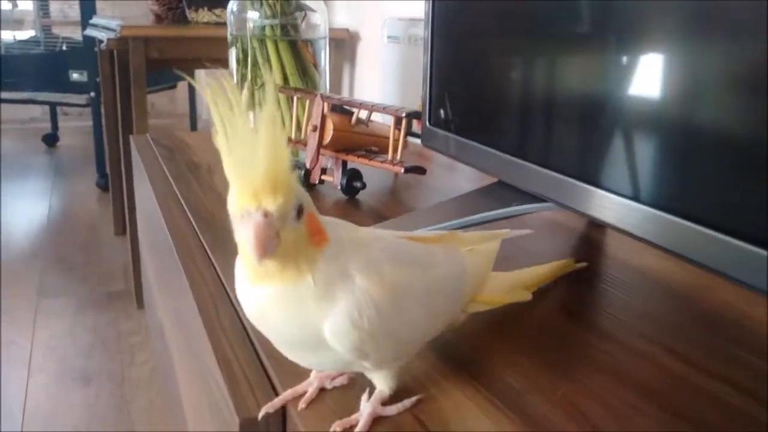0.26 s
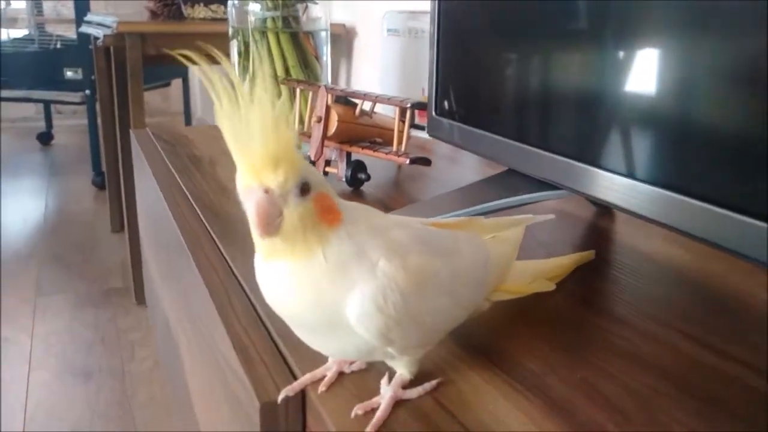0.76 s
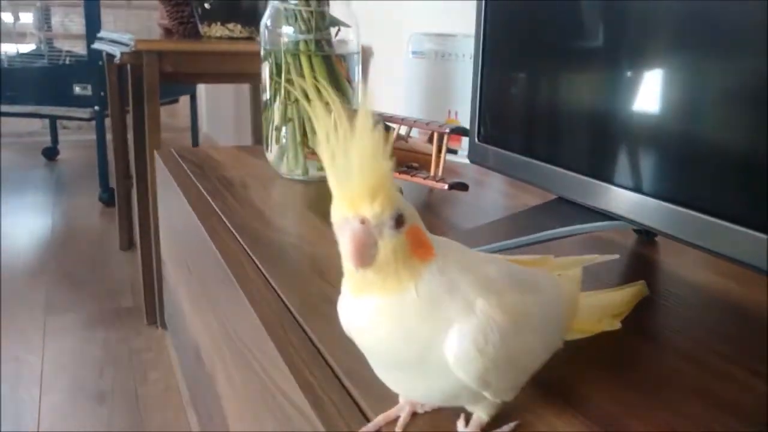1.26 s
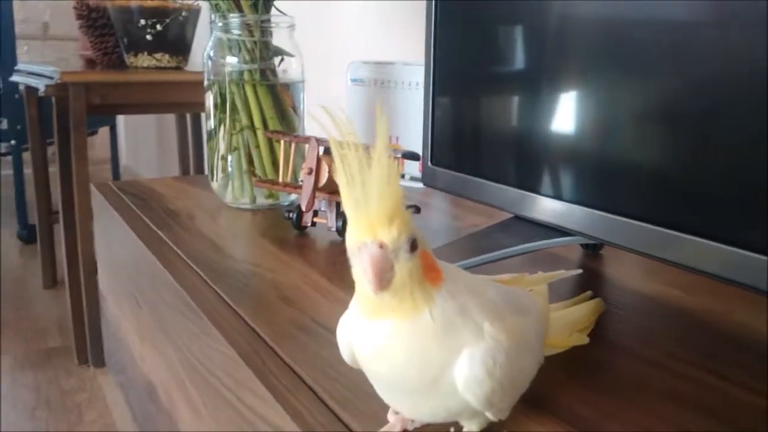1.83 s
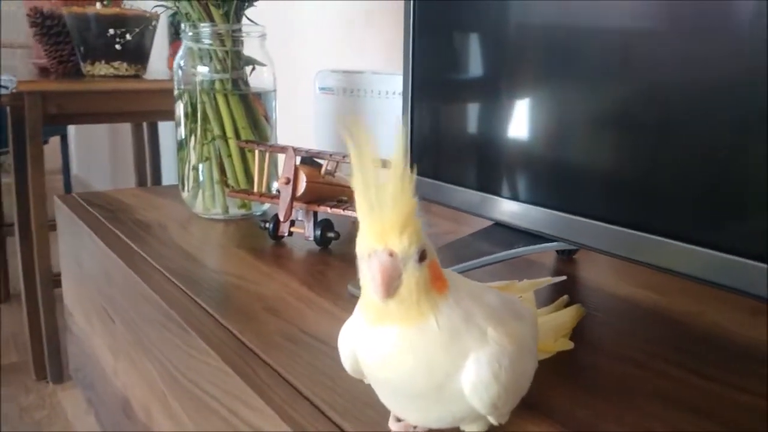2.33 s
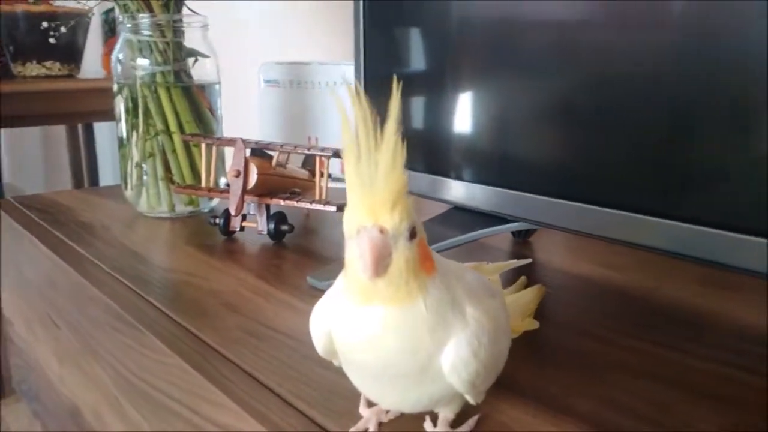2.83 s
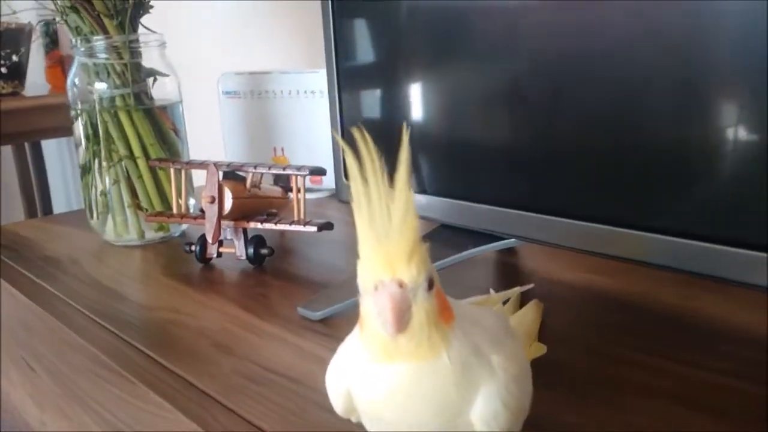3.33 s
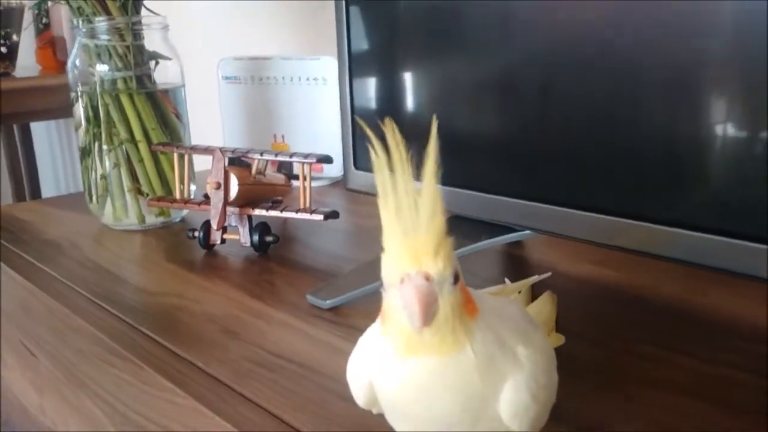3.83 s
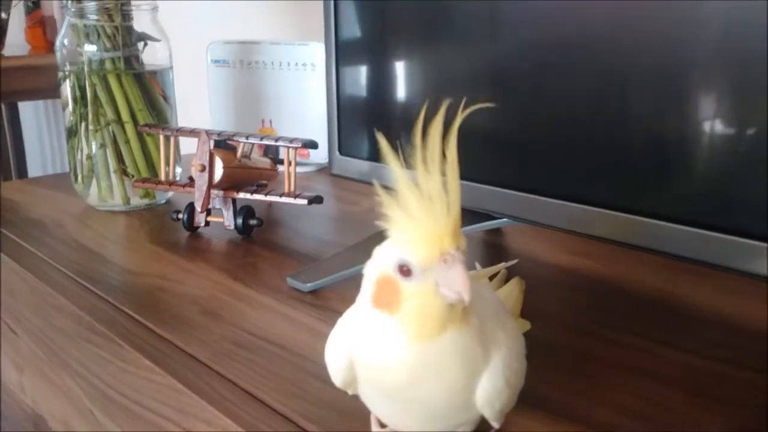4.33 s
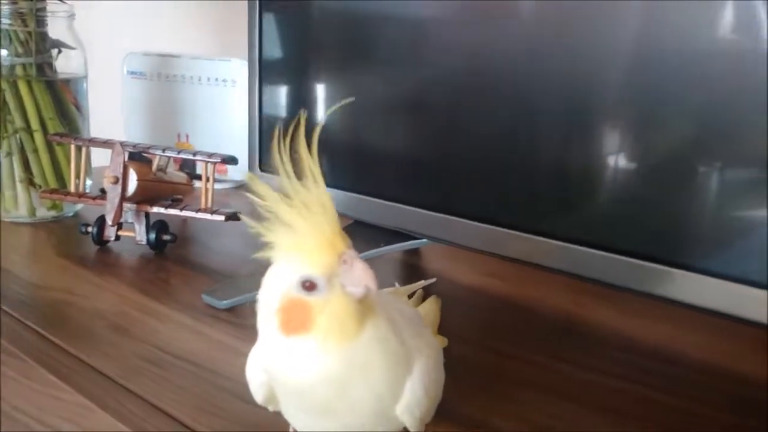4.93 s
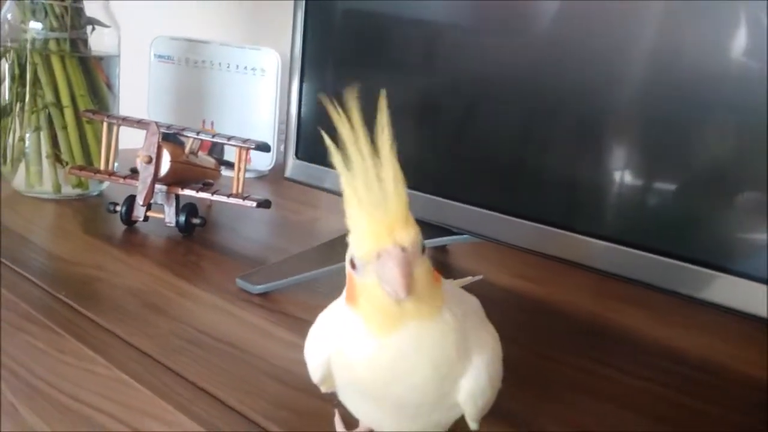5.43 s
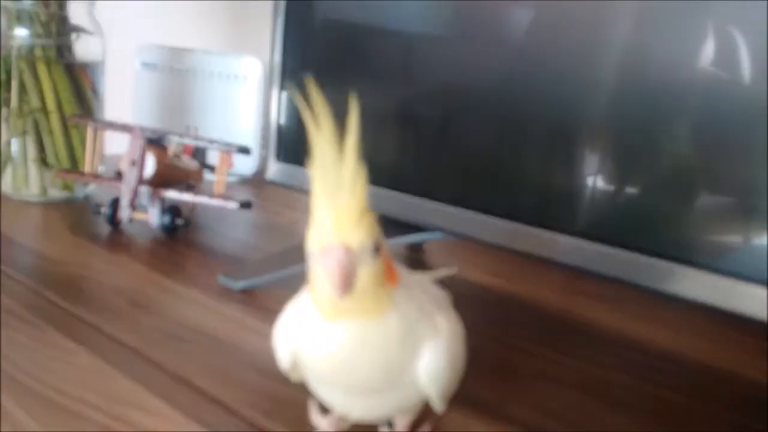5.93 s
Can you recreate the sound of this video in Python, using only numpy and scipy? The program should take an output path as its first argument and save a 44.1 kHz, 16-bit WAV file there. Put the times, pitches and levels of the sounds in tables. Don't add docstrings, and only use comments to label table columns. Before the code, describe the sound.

A cockatiel in a hard-surfaced living room opens with a loud falling peep, then gives scattered quick chirps, swoops and soft whistles, peaking in two high cries around four seconds before going mostly quiet. A faint motor hum throbs beneath. The close handheld microphone picks up finger rubs and dull bumps, then sharp taps and a heavy slam near the end.

```python
import sys
import numpy as np
from scipy import signal
from scipy.fft import rfft, irfft, next_fast_len
from scipy.io import wavfile
from scipy.ndimage import uniform_filter1d

SR = 44100
rng = np.random.default_rng(int(sys.argv[2]) if len(sys.argv) > 2 else 0)


def magnitude_from_level(level_db):
    exponent = np.asarray(level_db, float) / 20
    return 10 ** exponent


def bounce(signal):
    frames = np.transpose(np.atleast_2d(signal))
    limited = np.clip(frames, -1, 1)
    pcm = np.round(limited * 32767).astype(np.int16)
    wavfile.write(sys.argv[1], SR, pcm)


N = 272097

# f/Hz, level/dB per Hz
LOW_NOISE = [(18, -56.5), (30, -55), (59, -46), (113, -28), (167, -13.5), (269, -17), (305, 2), (351, -1),
             (392, 1), (521, -34.5), (610, -9), (670, -11), (823, -10.5), (905, -11), (1300, -17),
             (1690, -21), (2860, -120)]
# t/s, level/dB
LOW_NOISE_LEVEL = [(0.0, -41), (0.41, -42.5), (0.96, -38.5), (1.6, -41), (2.13, -39), (3.56, -40.5),
                   (4.11, -50), (4.69, -51), (5.05, -52.5), (5.77, -49), (6.03, -38), (6.17, -44)]
# f/Hz, level/dB per Hz
HIGH_NOISE = [(650, -45.5), (1100, -25.5), (1210, -14), (1440, -13), (1850, -3), (2000, -3.5), (2220, -5),
              (2580, -1.5), (3260, -2.5), (3550, -4.5), (3860, -8), (4120, -15), (6000, -33), (7800, -66),
              (13200, -120)]
# t/s, level/dB
HIGH_NOISE_LEVEL = [(0, -49), (2.2, -55.5), (3.4, -55), (4.5, -59.5), (5.05, -60), (5.2, -53.5),
                    (5.4, -57.5), (5.6, -61), (5.9, -58), (6.17, -53.5)]
# f/Hz, level/dB per Hz
PREAMP = [(2940, -23), (5000, -15.5), (5820, -4.5), (6100, -15), (6620, -13.5), (8000, -10.5),
          (10500, -12.5), (14000, -1.5), (15100, -12), (15500, -7), (15800, -57)]
# f/Hz, likeness (0 to 1)
LIKENESS = [(60, 0.88), (240, 0.98), (950, 1), (3770, 0.9), (15000, 0.11)]

# t/s, length/s, hum level/dB, whine level/dB
THROBS = [
    (0.048, 0.46, -50, -56),
    (0.67, 0.81, -47, -53.5),
    (1.468, 0.39, -46.5, -48.5),
    (2.102, 0.35, -48.5, -49),
    (2.659, 0.34, -49, -51),
    (3.271, 0.35, -46.5, -46),
    (3.938, 0.16, -51.5, -47),
    (4.37, 0.91, -81, -60),
    (6.01, 0.13, -60, -48),
]
# t/s, level/dB, f/Hz
CREAK = [
    (5.967, -29.5, 345),
    (6.03, -26.5, 372.4),
    (6.1, -33, 356),
    (6.115, -56, 380),
    (6.15, -34, 367),
    (6.17, -66.5, 363),
]

# t/s, length/s, level/dB
RUBS = [(0.52, 0.072, -57.5), (1.244, 0.35, -51.5), (1.45, .25, -46), (1.727, 0.14, -43),
        (2.001, 0.089, -47.5), (2.381, 0.071, -55.5), (2.53, 0.17, -50.5), (3.03, 0.24, -48),
        (3.589, .22, -46.5), (4.167, 0.044, -59.5), (4.568, 0.077, -54.5), (5.811, 0.016, -40.5)]
# f/Hz, level/dB per Hz
RUB_COLOUR = [(25, -54.5), (45, -8.5), (70, -0.5), (150, 3.5), (250, 1.5), (450, -4), (900, -42)]
# t/s, peak level/dB, ring f/Hz, ring time to fall 60 dB/s, knock level/dB
BUMPS = [(0.089, -27, 147, 0.026, -22.5), (1.908, -36, 366, 0.054, -10), (2.065, -27.5, 294, 0.056, -1.5),
         (2.3, -25, 317, 0.021, -7), (4.704, -41, 230, 0.092, -10), (2.559, -21, 120, 0.034, -17),
         (2.582, -30.5, 117.7, 0.12, -6.5), (2.608, -22.5, 123.5, 0.015, -17),
         (2.752, -29.5, 340, 0.08, -26), (3.689, -27.5, 352, 0.068, -12), (4.554, -38, 360, 0.087, -14),
         (4.688, -37, 405, 0.052, -11), (4.721, -37, 420, 0.064, -3), (5.713, -34.5, 392, 0.076, -23),
         (5.742, -29, 146, 0.025, -21)]
# t/s, peak level/dB, ring f/Hz, ring time to fall 60 dB/s, rattle level/dB
TICKS = [
    (5.5127, -19.5, 2500, 0.002, -12),
    (5.5303, -17, 2640, 0.0043, -34),
]
# t/s, peak level/dB
SLAMS = [
    (5.5197, -14.5),
    (5.8413, 3.5),
    (5.896, -16),
]
# t/s, length/s, level/dB
RUSTLES = [
    (5.943, .2, -59),
]

# f/Hz, level/dB
UPPER = [(3500, -25.5), (5000, -16.5), (5700, -19.5), (6200, -18.5), (6600, -31.5), (7000, -44),
         (7700, -27.5), (8500, -39.5), (9600, -63.5), (10900, -33.5), (12000, -40), (13200, -32.5),
         (14200, -24), (14900, -35.5), (15500, -55)]
# f/Hz, level/dB
THROAT = [(1150, -8), (1450, -6), (1750, 1.5), (2400, -7), (3300, -5), (4300, -0.5), (5250, 1),
          (5700, -1.5), (6600, -20.5)]
# band f/Hz (low, high), level/dB
BREATH = [((2300, 4400), -26), ((4400, 6100), -39), ((8900, 9000), -55.5), ((10500, 14000), -46.5)]
# t/s, third partial level/dB, higher partials level/dB, left-right level/dB
FACING = [(0, -2, 2.5, 2), (.14, -5.5, -1.5, 2), (.29, -2, 1.5, 1), (.455, 5, 2.5, 1), (.63, -1.5, 0.5, 0),
          (.87, 4, 2.5, 0), (1.07, -3.5, -5, 1.5), (1.3, 2.5, -0.5, 0), (1.48, 1, 4, 0),
          (1.87, -3, -1, -0.5), (3.14, 4, -0.5, -0.5), (3.59, 1.5, -2, -0.5), (3.7, -5, 1.5, -1),
          (4.05, 0, 2, -1), (4.53, 0.5, 0.5, -1), (4.72, -4, 4, -1), (5.75, 1, 3, 0), (6.03, 6, 5, 0)]

# t/s, length/s, top f/Hz, effort level/dB, overtones level/dB
CHIRPS = [
    (0.293, 0.069, 1804, -25.5, 1),
    (1.306, 0.048, 1635, -31, 0.5),
    (1.479, .084, 1636, -26.5, -8.5),
    (5.755, 0.056, 1564, -45.5, 11),
]
SQUAWKS = [
    (3.587, .076, 2366, -27, -5),
]
SWOOPS = [
    (1.743, .057, 2177, -28, -15),
    (2.399, 0.04, 2082, -26.5, -19.5),
    (2.75, 0.053, 2050, -33, -25.5),
    (3.469, 0.069, 2203, -41, -10.5),
]
CRIES = [
    (4.045, .097, 3100, -19.5, -12.5),
    (4.153, .085, 3292, -24.5, -11.5),
]
PEEPS = [
    (0.0, 0.052, 2340, -11, -4.5),
]
SLIDES = [
    (3.84, 0.042, 1914, -33.5, 0.51),
    (4.308, .068, 2066, -44, 8.7),
]
SHRIEKS = [
    (4.533, .12, 2918, -34, -2.5),
]
PIPS = [
    (0.873, 0.034, 1735, -31, 6.1),
    (1.066, 0.027, 1680, -34, 4.5),
    (6.026, 0.045, 1672, -50, 19.5),
]
DIPS = [
    (0.143, .05, 1893, -21, -2),
    (.455, .066, 1925, -17.5, -6.5),
]
YELPS = [
    (3.701, .066, 2802, -24, -5.5),
]
MUMBLES = [
    (.632, .058, 1826, -25.5, -3),
]

# t/s, length/s, first f/Hz, last f/Hz, effort level/dB
WHISTLES = [(0.132, .02, 2150, 1880, -23), (4.315, 0.054, 2060, 1997, -45), (1.616, 0.022, 2106, 2058, -24),
            (1.639, 0.016, 2020, 2054, -21), (2.419, 0.029, 1719, 1660, -26),
            (3.518, 0.015, 1754, 1625, -31.5), (3.641, 0.026, 1740, 1660, -35.5),
            (3.872, 0.047, 1843, 1657, -35), (1.592, 0.035, 1630, 1600, -41.5),
            (4.619, 0.022, 1668, 1706, -35), (1.5, 0.03, 1722, 2400, -44), (1.864, 0.13, 1597, 1766, -41),
            (1.869, 0.044, 1157, 1103, -48.5), (2.513, 0.044, 1302, 1194, -44.5),
            (2.794, 0.049, 1818, 2123, -33), (2.865, .06, 1422, 1138, -46),
            (3.242, 0.047, 1314, 1200, -42.5), (4.248, 0.028, 1550, 1200, -57),
            (4.357, 0.035, 1940, 2065, -36.5), (3.757, .035, 2700, 2400, -36.5),
            (2.84, 0.043, 1900, 2120, -40)]
MORE_WHISTLES = [
    (0.0, .014, 2500, 2330, -26),
    (3.765, .04, 1500, 1200, -43),
    (2.0, .07, 1330, 1180, -50),
    (1.64, .05, 1120, 1000, -52),
]
BUZZES = [
    (1.874, 0.078, 2307, 1965, -30.5),
    (3.139, 0.065, 1944, 1797, -35.5),
    (4.706, 0.07, 2217, 1798, -42.5),
]

CHIRP = dict(last_hz=1200, droop_hz=1070, drop_hz=16120, landing_s=0.00078, attack_s=0.0084, release_s=0.018,
             fade_db=-5, lift_db=1.5, third_db=-8.5, harsh_db=3, open_share=0.59, shut_db=-14)
SQUAWK = dict(last_hz=1201, droop_hz=1510, drop_hz=26060, landing_s=0.001, attack_s=0.005, release_s=0.024,
              fade_db=-5, lift_db=-7, third_db=-9, harsh_db=13.5, open_share=0.58, shut_db=-15)
SWOOP = dict(last_hz=1660, droop_hz=1490, drop_hz=34960, landing_s=0.016, attack_s=0.015, release_s=0.00045,
             fade_db=-6, lift_db=1, third_db=-20.5, harsh_db=2, open_share=0.77, shut_db=-15.5)
CRY = dict(last_hz=1658, droop_hz=10100, drop_hz=40200, landing_s=0.014, attack_s=0.023, release_s=0.0041,
           fade_db=-17.5, lift_db=-1, third_db=-18, harsh_db=12.5, open_share=1, shut_db=-17)
PEEP = dict(last_hz=1224, droop_hz=5550, drop_hz=16540, landing_s=0.00048, attack_s=0.0024, release_s=0.073,
            fade_db=-7.5, lift_db=-2.5, third_db=-0.5, harsh_db=1.5, open_share=0.77, shut_db=-35.5)
SLIDE = dict(last_hz=1680, droop_hz=2660, drop_hz=11600, landing_s=0.0033, attack_s=0.0045, release_s=0.0053,
             fade_db=-3, lift_db=-0.5, third_db=-14.5, harsh_db=4.5, open_share=0.21, shut_db=-1.5)
SHRIEK = dict(last_hz=1200, droop_hz=1066, drop_hz=27200, landing_s=0.00088, attack_s=0.0037, release_s=0.032,
              fade_db=-1.5, lift_db=-1, third_db=0, harsh_db=6, open_share=0.1, shut_db=0)
PIP = dict(last_hz=1245, droop_hz=4400, drop_hz=16840, landing_s=0.0024, attack_s=0.0047, release_s=0.019,
           fade_db=-4.5, lift_db=-0.5, third_db=-15.5, harsh_db=-0.5, open_share=0.28, shut_db=-15.5)
DIP = dict(last_hz=1259, droop_hz=2860, drop_hz=16360, landing_s=0.0011, attack_s=0.0025, release_s=0.032,
           fade_db=-10.5, lift_db=1.5, third_db=-6.5, harsh_db=0.5, open_share=0.88, shut_db=-20.5)
YELP = dict(last_hz=1705, droop_hz=1900, drop_hz=44600, landing_s=0.003, attack_s=0.006, release_s=0.0061,
            fade_db=-10, lift_db=-2.5, third_db=-6, harsh_db=15.5, open_share=0.7, shut_db=-17)
MUMBLE = dict(last_hz=1243, droop_hz=4200, drop_hz=19900, landing_s=0.0009, attack_s=0.0038, release_s=0.012,
              fade_db=-9.5, lift_db=0, third_db=-5.5, harsh_db=-1, open_share=0.93, shut_db=-42)
PURE = dict(second_db=-30, third_db=-37.5, harsh_db=-12)
PRESSED = dict(second_db=-24.5, third_db=-21, harsh_db=9.5)

# delay t/s, level/dB
ECHOES = [(.0023, -11), (.0054, -8), (.0093, -3.5), (.0139, -11), (.0187, -8), (.0247, -18)]
# f/Hz, time to fall 60 dB/s
ROOM = [(1000, 0.62), (2000, 0.46), (3500, 0.45), (6000, 0.33), (12000, 0.22)]
# f/Hz, level/dB
CASE = [(1300, 5.5), (1660, 2.5), (1880, -0.5), (2080, 3), (2380, 8), (2700, 4), (3000, 7), (3330, -2),
        (3600, 4.5), (3950, 1), (4330, 2), (4800, -17), (5250, -15), (5650, -13.5), (6100, -12.5)]
# f/Hz, width/Hz, level/dB
CAVITY = [(1676, 140, -7.5), (2990, 160, -3), (3620, 260, -13), (4495, 320, -8), (5280, 200, -8),
          (5960, 150, 0.5)]
# f/Hz, level/dB
PORT_LEVEL = [(60, -1), (120, 0), (240, -0.5), (480, -0.5), (950, -1.5), (1890, 0.5), (3770, 3), (7520, 5),
              (15000, 2)]
# f/Hz, phase/radians
PORT_PHASE = [(0, 0), (1400, 0.18), (2070, 1.1), (2760, 0.59), (4570, 0.81), (9390, -2.5), (11700, 3),
              (14400, -2.5), (15200, -6.5)]

LONGEST = 6000


def evened(x):
    return x / np.sqrt(np.mean(x ** 2) + 1e-20)


def read(points, hz):
    f, value = np.transpose(points)
    return np.interp(np.log(hz + 1), np.log(f + 1), value)


def at_time(rows, axis, t):
    return np.interp(t, [r[0] for r in rows], [r[axis] for r in rows])


def curve(rows, axis):
    return at_time(rows, axis, np.arange(N) / SR)


def add(mix, s, sound):
    part = mix[round(s * SR):][:len(sound)]
    part += sound[:len(part)]


def drift(count, span):
    once = uniform_filter1d(rng.standard_normal(count), span)
    return evened(uniform_filter1d(once, span))


def swell(s, length, edge):
    t = np.arange(N) / SR - s
    return np.sin(np.pi / 2 * np.clip(np.minimum(t, length - t) / edge, 0, 1)) ** 2


def bandpass(order, band, x):
    return signal.lfilter(*signal.butter(order, band, "band", fs=SR), x)


def noise(colour, patchy_db, band):
    frames, hz = N // 256 + 5, np.fft.rfftfreq(2048, 1 / SR)
    a, b, c, d, patches = rng.standard_normal((frames // 2, 1025, 5)).T
    patches = evened(uniform_filter1d(uniform_filter1d(patches, 10, 0), 6, 1))
    same = np.clip(read(LIKENESS, hz), -1, 1)[:, None]
    left = a + 1j * b
    right = same * left + np.sqrt(1 - same ** 2) * (c + 1j * d)
    gain = magnitude_from_level(read(colour, hz))
    inside = (hz > band[0]) & (hz < band[1])
    share = np.sqrt(np.sum(gain[inside] ** 2) / np.sum(gain ** 2))
    z = np.array([left, right]) * gain[:, None] * magnitude_from_level(patchy_db * patches)
    return evened(signal.istft(z, nperseg=2048, noverlap=1536)[1][:, :N]) / share


def preamp_hiss():
    return magnitude_from_level(-71) * noise(PREAMP, patchy_db=4.0, band=(7000, 15000))


def room_noise():
    low = magnitude_from_level(curve(LOW_NOISE_LEVEL, axis=1)) * noise(LOW_NOISE, patchy_db=2.0, band=(250, 1000))
    high = magnitude_from_level(curve(HIGH_NOISE_LEVEL, axis=1)) * noise(HIGH_NOISE, patchy_db=1.2, band=(1100, 6000))
    return low + high


def motor():
    hum_hz, whine_hz = 129.2, 710
    waver = 1 + 0.00561 * drift(N, span=3000)
    hum, whine = (sum(magnitude_from_level(row[k]) * swell(row[0], row[1], 0.0092) for row in THROBS) for k in (2, 3))
    hum = hum * np.sin(2 * np.pi * np.cumsum(hum_hz * waver) / SR)
    whine = whine * np.sin(2 * np.pi * np.cumsum(whine_hz * waver) / SR)
    creak = magnitude_from_level(curve(CREAK, axis=1)) * np.sin(2 * np.pi * np.cumsum(curve(CREAK, axis=2)) / SR)
    return hum + whine + swell(CREAK[0][0] - 0.005, 1, 0.01) * creak


def rubbing():
    slide = sum(magnitude_from_level(db) * swell(s, length, 0.044) for s, length, db in RUBS)
    lumps = magnitude_from_level(2.5 * drift(N, span=400))
    rumble = noise(RUB_COLOUR, patchy_db=1.5, band=(40, 240))
    return (magnitude_from_level(-55.5) + slide * lumps) * rumble


def bumps():
    out, t = np.zeros(N), np.arange(8000) / SR
    onset = (1 - np.exp(-t / 0.00068)) ** 2
    for s, db, hz, t60, knock_db in BUMPS:
        turns = hz * (t + 0.0016 * (1 - np.exp(-t / 0.00047)))
        ring = magnitude_from_level(-60 * t / t60) * np.sin(2 * np.pi * turns)
        knock = magnitude_from_level(knock_db - 60 * t / 0.039) * np.sin(2 * np.pi * 720 * t)
        thud_db = -12.5 - 0.35 * knock_db
        thud = magnitude_from_level(thud_db - 60 * t / 0.033) * np.sin(2 * np.pi * 72 * t)
        add(out, s, magnitude_from_level(db + 5.0) * onset * (ring + knock + thud))
    return out


def ticks():
    out, t = np.zeros(N), np.arange(8000) / SR
    onset = (1 - np.exp(-t / 0.00019)) ** 2
    for s, db, hz, t60, rattle_db in TICKS:
        rattle = bandpass(2, [900, 4300], rng.standard_normal(len(t)))
        ping = magnitude_from_level(9.5 - 60 * t / t60) * onset * np.sin(-2 * np.pi * hz * t)
        add(out, s, magnitude_from_level(db) * (ping + magnitude_from_level(rattle_db + 1.0 - 60 * t / 0.04) * rattle))
    return out


def slams():
    boom_hz, sink_hz, sink_s = 52.5, 270, 0.0034
    out, t = np.zeros(N), np.arange(4000) / SR
    turns = boom_hz * t + sink_hz * sink_s * (1 - np.exp(-t / sink_s))
    fade = (1 - np.exp(-t / 0.00066)) ** 2 * (np.exp(-t / 0.0025) + magnitude_from_level(-19 - 60 * t / 0.12))
    boom = fade * np.sin(2 * np.pi * turns)
    knock = magnitude_from_level(-13.0 - 60 * t / 0.014) * np.sin(2 * np.pi * 760 * t)
    for s, db in SLAMS:
        add(out, s, magnitude_from_level(db) * (boom + knock))
    return out


def blows():
    dull = signal.butter(6, 4300, fs=SR, output="sos")
    sides_db = np.array([[-1.5], [1.5]])
    return magnitude_from_level(sides_db) * signal.sosfilt(dull, bumps() + ticks() + slams())


def feathers():
    hiss = evened(bandpass(3, [3400, 5900], rng.standard_normal(N)))
    strength = sum(magnitude_from_level(db) * swell(s, length, 0.02) for s, length, db in RUSTLES)
    return strength * magnitude_from_level(2.7 * drift(N, span=150)) * hiss


def falling(row, last_hz, droop_hz, drop_hz, landing_s, attack_s, release_s,
            fade_db, lift_db, third_db, harsh_db, open_share, shut_db):
    s, length, top_hz, effort_db, over_db = row
    t = np.arange(0, length, 1 / SR)
    droop = top_hz - droop_hz * t
    drop = last_hz + drop_hz * (length - landing_s - t)
    hz = np.maximum(np.minimum(droop, drop), last_hz)
    edges = np.clip(np.minimum(t / attack_s, (length - t) / release_s), 1e-4, 1)
    level_db = effort_db + 20 * np.log10(edges)
    beak_db = over_db + shut_db * np.clip(1 - t / (open_share * length), 0, 1) ** 2
    landed = np.clip((t - length + 2.9 * landing_s) / (0.33 * landing_s), 0, 1)
    fallen = (top_hz - hz) / (top_hz - last_hz)
    shape_db = [fade_db * fallen + lift_db * landed,
                beak_db - lift_db * landed,
                beak_db + third_db + fade_db * fallen]
    partial_db = [level_db + db + read(THROAT, (k + 1) * hz) for k, db in enumerate(shape_db)]
    return s, hz, partial_db, harsh_db


def gliding(row, second_db, third_db, harsh_db):
    s, length, first_hz, last_hz, effort_db = row
    t = np.arange(0, length, 1 / SR)
    edges = np.clip(np.minimum(t, length - t) / 0.0089, 1e-4, 1)
    level_db = effort_db + 20 * np.log10(edges)
    hz = first_hz + (last_hz - first_hz) * t / length
    partial_db = [level_db, level_db + second_db, level_db + third_db + read(THROAT, 3 * hz)]
    return s, hz, partial_db, harsh_db


def note(s, hz, partial_db, harsh_db):
    hz = uniform_filter1d(hz, 200, mode="nearest")
    hz = hz * (1 + 0.008 * drift(LONGEST, span=70)[:len(hz)])
    turn = 2 * np.pi * np.cumsum(hz) / SR
    partial_db = partial_db[:2] + [partial_db[2] + at_time(FACING, 1, s)]
    late_db = -13.5 * np.exp(-np.arange(len(hz)) / SR / 0.012)
    upper_db = np.max(partial_db, 0) + harsh_db + at_time(FACING, 2, s) + late_db
    upper = []
    for k in range(4, 12):
        too_high = k * hz > SR / 2.2
        upper.append(upper_db + read(UPPER, k * hz) - 99 * too_high)
    tone = 0
    for k, db in enumerate(partial_db + upper):
        tremble_db = min(1.7 + 2.2 * k, 6) * drift(LONGEST, span=110)[:len(hz)]
        strength = magnitude_from_level(db + tremble_db + read(CASE, (k + 1) * hz))
        tone = tone + strength * np.sin((k + 1) * turn)
    air = rng.standard_normal(LONGEST)[:len(hz)]
    breath = sum(magnitude_from_level(db) * bandpass(3, band, air) for band, db in BREATH)
    return s, tone + magnitude_from_level(upper_db) * breath


def parrot():
    bird = np.zeros(N)
    falls = ((CHIRPS, CHIRP), (SQUAWKS, SQUAWK), (YELPS, YELP), (SWOOPS, SWOOP), (SHRIEKS, SHRIEK), (DIPS, DIP),
             (PIPS, PIP), (CRIES, CRY), (PEEPS, PEEP), (MUMBLES, MUMBLE), (SLIDES, SLIDE))
    glides = ((WHISTLES, PURE), (MORE_WHISTLES, PURE), (BUZZES, PRESSED))
    for shape, calls in ((falling, falls), (gliding, glides)):
        for rows, manner in calls:
            for row in rows:
                add(bird, *note(*shape(row, **manner)))
    return bird


def room(x):
    wet_db, own_tail = 1, 0.27
    hz, t = np.fft.rfftfreq(256, 1 / SR), np.arange(N) / SR
    early = np.zeros(2000)
    early[0] = magnitude_from_level(-4.0)
    for k, (s, db) in enumerate(ECHOES):
        early[round(s * SR)] = (-1) ** k * magnitude_from_level(db)
    out = np.tile(signal.oaconvolve(x, early)[:N], (2, 1))
    for k in range(3):
        taps = rng.standard_normal((3, SR)) * (rng.random((3, SR)) < 0.08)
        taps = np.sqrt(1 - own_tail ** 2) * taps[0] + own_tail * taps[1:]
        taps *= np.clip((np.arange(SR) / SR - 0.012) / 0.0081, 0, 1)
        _, frames, z = signal.stft(taps, SR, nperseg=256)
        decay = magnitude_from_level(-60 * frames / read(ROOM, hz)[:, None])
        tail = signal.istft(z * decay, SR, nperseg=256)[1]
        tail = tail / np.sqrt(np.mean(abs(rfft(tail[0]))[1500:3500] ** 2))
        window = np.sqrt(2 / 3) * np.cos(np.pi * (t / 1.7 + k / 3))
        out += magnitude_from_level(wet_db) * signal.fftconvolve((x * window)[None], tail, axes=1)[:, :N]
    return out


def cavity(x):
    rings = (magnitude_from_level(db) * signal.lfilter(*signal.iirpeak(hz, hz / width, SR), x) for hz, width, db in CAVITY)
    return magnitude_from_level(-2) * x + sum(rings)


def ports(x):
    size = next_fast_len(N)
    hz = np.fft.rfftfreq(size, 1 / SR)
    half = magnitude_from_level(read(PORT_LEVEL, hz) / 2) * np.exp(0.5j * read(PORT_PHASE, hz))
    return irfft(rfft(x, size) * np.array([half, 1 / half]), size)[:, :N]


def scene():
    background = room_noise() + motor()
    handling = rubbing() + blows()
    aside = magnitude_from_level(curve(FACING, axis=3) * np.array([[0.5], [-0.5]]))
    bird = magnitude_from_level(5.5) * aside * cavity(room(parrot()))
    return ports(background + handling + feathers() + bird) + preamp_hiss()


def low_pass(x):
    return signal.sosfilt(signal.butter(12, 15700, fs=SR, output="sos"), x)


def record(dry):
    thin = signal.sosfilt(signal.butter(4, 50, "high", fs=SR, output="sos"), dry)
    return low_pass(thin)


dry = scene()
out = record(dry)
bounce(out)
```